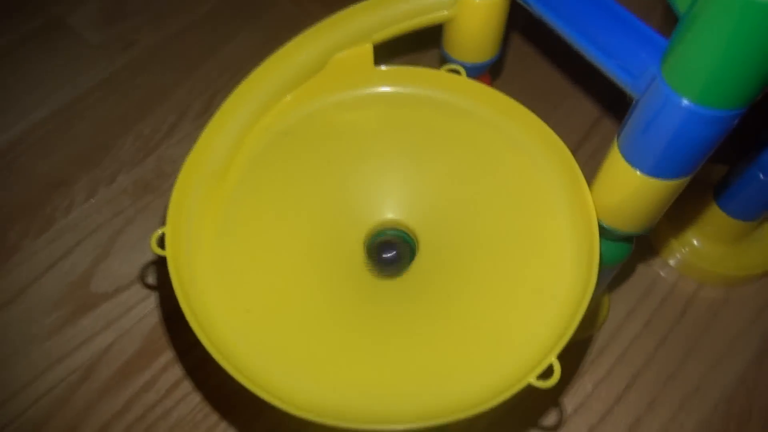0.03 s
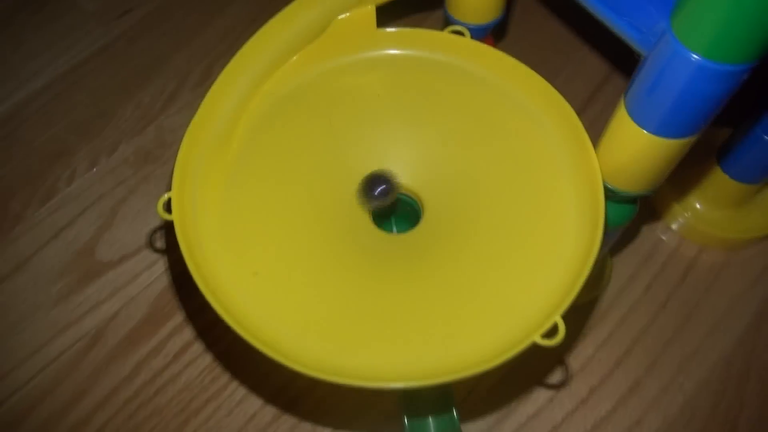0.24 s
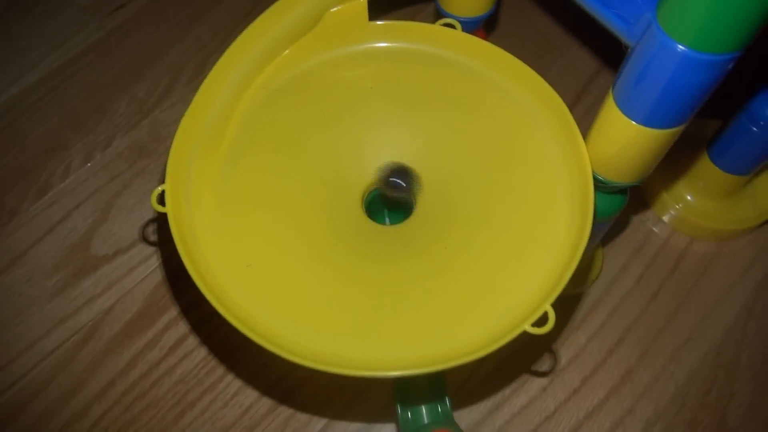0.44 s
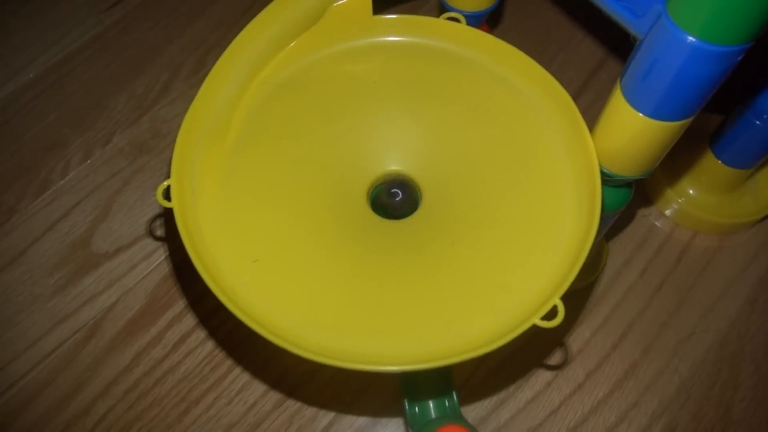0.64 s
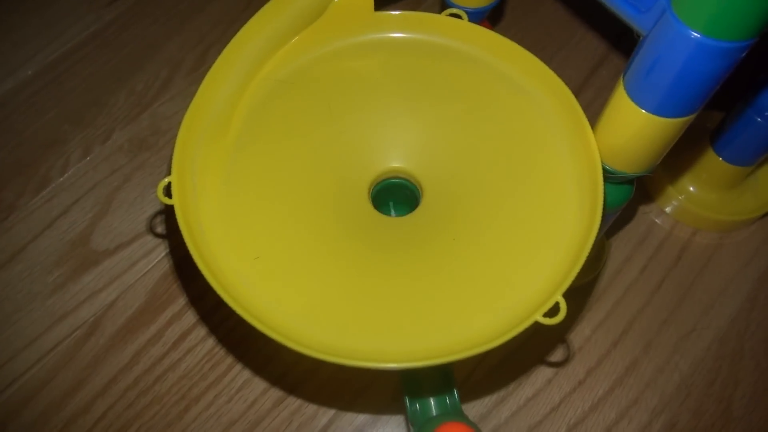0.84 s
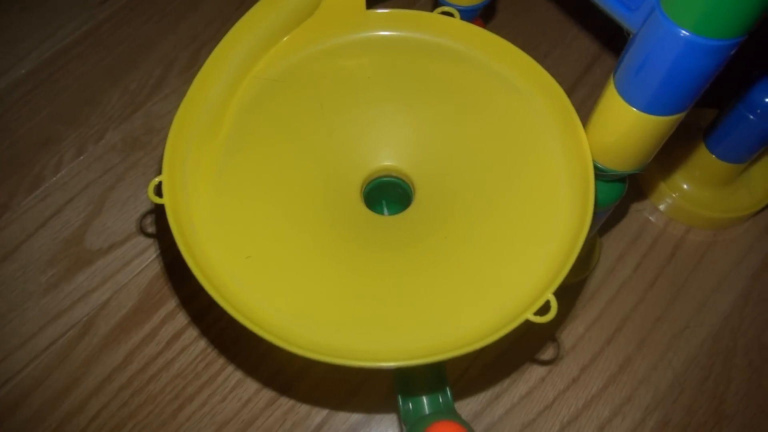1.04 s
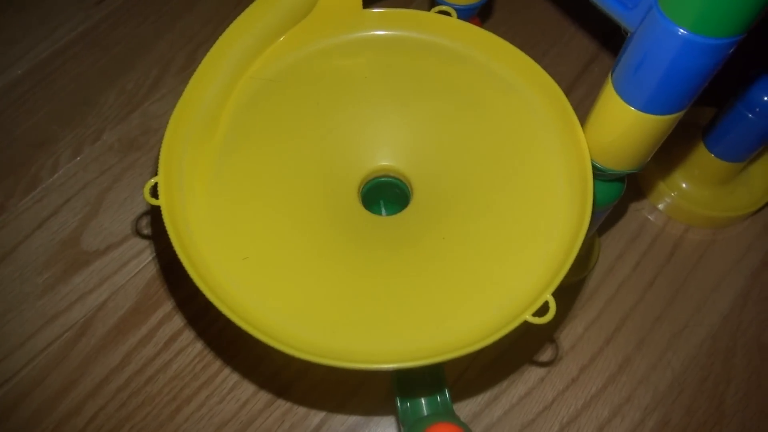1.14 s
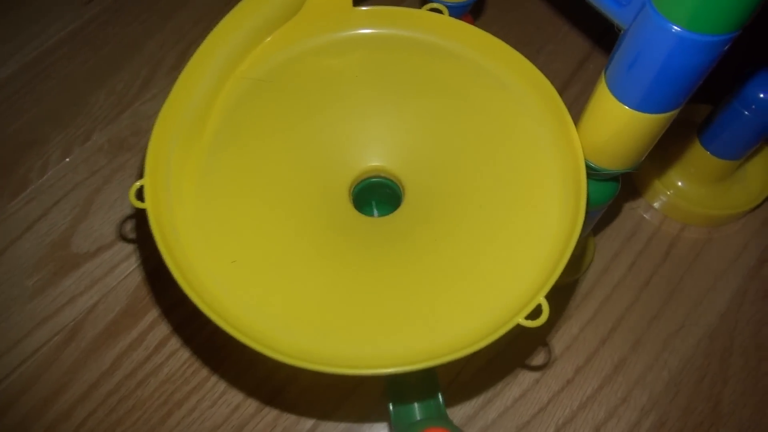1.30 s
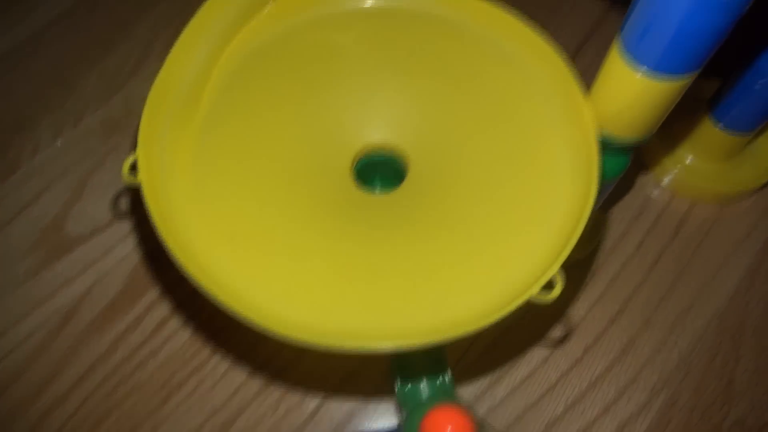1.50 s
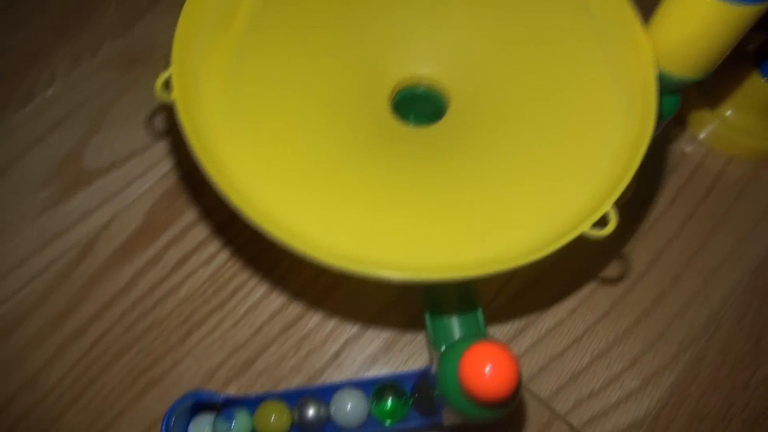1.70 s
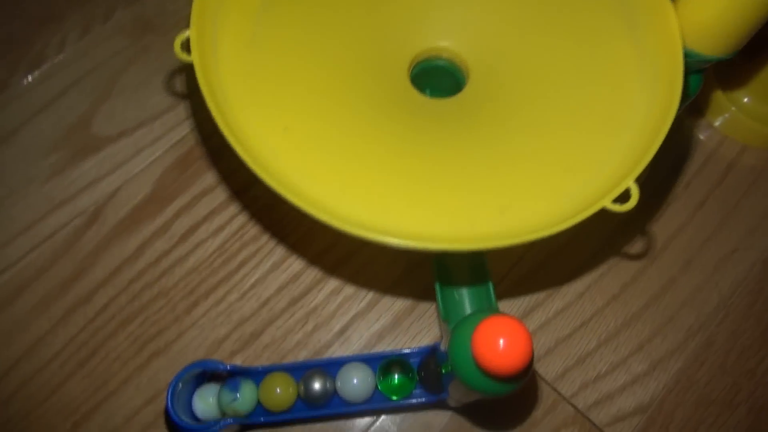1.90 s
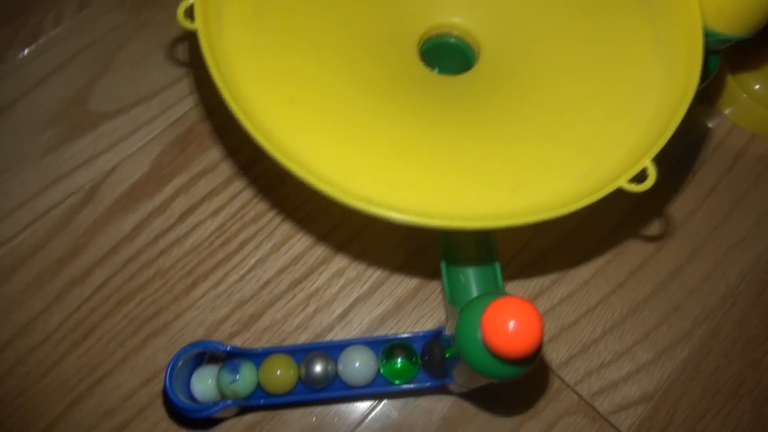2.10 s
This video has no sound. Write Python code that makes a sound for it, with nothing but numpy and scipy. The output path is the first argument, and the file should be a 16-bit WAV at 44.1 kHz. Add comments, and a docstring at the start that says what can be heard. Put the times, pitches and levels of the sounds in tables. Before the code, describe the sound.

A glass marble circles a plastic funnel with a low rumble, rattles harder and falls through. It rolls quietly along a chute, then clatters onto a track, followed by a clink and faint ticks, close to the microphone.

```python
"""A low, circling rumble: a glass marble rounds the throat of a plastic funnel, skips ever harder on the
wall and falls through. It rolls quietly along a chute, drops, and clatters onto a track on a wooden
floor; a glass clink and three light ticks follow. Every contact rings the whole plastic tower.
The microphone is close and hand-held, louder on the left, with soft handling thumps and a limiter."""
import sys
import numpy as np
from scipy import signal
from scipy.fft import rfft, irfft, next_fast_len
from scipy.io import wavfile
from scipy.ndimage import uniform_filter1d, minimum_filter1d

SR = 44100
rng = np.random.default_rng(int(sys.argv[2]) if len(sys.argv) > 2 else 0)


def inscribe(sig):
    """Save sig as 16-bit PCM at rate SR to the path in sys.argv[1].

    A 1-D sig is mono; a 2-D sig holds one channel per row.
    Samples are clipped to [-1, 1] before scaling.
    """
    pcm = np.round(np.clip(np.atleast_2d(sig).T, -1, 1) * 32767)
    wavfile.write(sys.argv[1], SR, pcm.astype(np.int16))


N = 94815
T = np.arange(N) / SR
SIZE = next_fast_len(N + SR, real=True)
HZ = np.arange(SIZE // 2 + 1) * SR / SIZE

# room tone: (frequency [Hz], gain [dB])
ROOM_TONE_EQ = [(22, -34), (42, -6.5), (160, -9), (800, -28.5), (15000, -43.5)]
# handling thumps: (time [s], level [dB], pitch [Hz], length [s])
THUMPS = [(1.883, -45, 56.1, 0.15), (2.133, -36, 128, 0.031)]
# light ticks and a glass clink: (time [s], level [dB])
TICKS = [(1.718, -48), (1.956, -50.5), (2.045, -53)]
CLINKS = [(1.565, -39.5)]
# rolling envelopes, and bumps on the chute's sides: (time [s], level [dB])
CHUTE_ROLL = [(1.059, -50), (1.15, -53.5), (1.18, -44), (1.335, -47), (1.35, -72.5)]
TRACK_ROLL = [(1.376, -46.5), (1.419, -42.5), (1.443, -27.5), (1.56, -61.5)]
CHUTE_BUMPS = [(1.078, -53), (1.146, -44.5), (1.172, -41.5), (1.2085, -36), (1.296, -32.5), (1.325, -39.5),
               (1.332, -32.5)]
# rolling envelope and wall knocks in the funnel: (time [s], body level [dB], rattle level [dB])
FUNNEL_ROLL = [(0.0, -42.5, -58), (0.188, -47, -61), (0.298, -34, -55.5), (0.494, -48.5, -59),
               (0.508, -31.5, -53.5), (0.6, -31, -47), (0.625, -30, -52), (0.635, -20, -26),
               (0.678, -33, -43), (0.706, -26, -29), (0.765, -24.5, -27), (0.815, -35, -41),
               (0.855, -42, -42), (0.892, -28.5, -32), (0.936, -30.5, -40.5), (0.972, -32, -50.5),
               (0.989, -32, -48)]
FUNNEL_KNOCKS = [(0.3382, -27.5, -45), (0.504, -26, -47.5), (0.63, -22.5, -31.5), (0.665, -20, -41.5),
                 (0.693, -22.5, -31), (0.7322, -19.5, -41), (0.7464, -16, -14.5), (0.767, -20, -18.5),
                 (0.78, -20, -38), (0.792, -30, -19), (0.8023, -27, -25.5), (0.8613, -11.5, -20.5),
                 (0.884, -20.5, -26.5), (0.916, -21, -34), (0.9474, -19.5, -35.5), (0.9607, -24, -36)]
# hard bounces, two in the funnel's throat, the rest on the track:
# (time [s], body level [dB], crack level [dB], clack pitch [Hz])
BOUNCES = [(0.831, -18.5, -13, 1570), (0.837, -42, -23, 2720), (1.3861, -10.5, -11, 1620),
           (1.399, -23.5, -19, 1970), (1.4141, -25.5, -21, 5580), (1.4311, -11.5, -8.5, 2730),
           (1.456, -22, -33, 5740), (1.4708, -28.5, -13.5, 4030), (1.478, -21, -21.5, 7280),
           (1.496, -20, -24.5, 2180)]
# tone of each part and kind of contact: (frequency [Hz], gain [dB])
TICK_EQ = [(120, -1.5), (1400, 8), (2700, 2), (4200, -28), (15000, -29)]
CLINK_EQ = [(4500, -2), (7000, 5), (12000, -29)]
CHUTE_EQ = [(220, -20), (620, -5), (1600, 4.5), (4300, -10.5), (13000, -35)]
TRACK_EQ = [(60, -19), (175, -5.5), (280, -3), (620, 8.5), (2600, 12), (3500, 0.5), (15000, -36.5)]
RUMBLE_EQ = [(200, -41.5), (370, 7), (800, 10.5), (1300, 5), (2400, -40)]
FUNNEL_EQ = [(60, -26.5), (280, -13), (420, -8), (530, -9.5), (700, 1), (1100, -3), (2000, 6),
             (2350, -12.5), (3000, -22), (15000, -73)]
RATTLE_EQ = [(600, -30.5), (2000, -1), (2850, 8.5), (4500, -1.5), (4950, -3), (8200, -11), (15000, -28)]
CRACK_EQ = [(500, -19.5), (2000, 7), (5800, 1.5), (8500, -7.5), (12500, -18.5), (15000, -29.5)]
# ringing of the plastic parts: (frequency [Hz], resonance height [dB])
CHUTE_MODES = [(371, 24), (1150, 2.3), (1620, 2.3), (2480, 15), (3070, 7)]
TRACK_MODES = [(184, 18), (636, 8.1), (1276, 8.4), (2558, 5.3), (2743, 4.3), (3060, 9.1)]
FUNNEL_MODES = [(184, 15.5), (421, 9), (636, 12), (977, 14), (1046, 12), (1116, 17), (2020, 8.5)]
# stereo lean: (frequency [Hz], left minus right [dB])
BALANCE = [(60, 16.5), (600, 10), (13000, 13.5)]

RING_T60_S, TREBLE_T60_S = 0.23, 0.2
SCATTER_DB, SCATTER_T60_S = 2.5, 0.036   # waves running to and fro in the plastic
HOP_S, HOP_SPREAD, HOP_SPREAD_DB = .0052, .22, 12   # the rolling marble makes tiny hops
GRIT_PER_S, GRIT_DB = 2800, -6   # surface roughness between the hops
BLOW_S = 0.007   # a blow's level is its energy spread over this time


def from_db(db):
    """Decibels to gain."""
    return 10 ** (np.asarray(db) / 20)


def unit(x):
    """Scale to energy 1."""
    return x / np.sqrt(np.sum(x ** 2) + 1e-20)


def envelope(times, db):
    """Gain along a level curve, silent outside it."""
    return from_db(np.interp(T, times, db, left=-120, right=-120))


def eq_curve(points):
    """Gain at every frequency from (Hz, dB) points."""
    hz, db = np.transpose(points)
    return from_db(np.interp(np.log(HZ + 1), np.log(hz), db))


def colour(points):
    """Minimum-phase filter with this EQ, so nothing sounds ahead of a hit."""
    cepstrum = irfft(np.log(eq_curve(points)), SIZE)
    cepstrum[1:SIZE // 2] *= 2
    cepstrum[SIZE // 2 + 1:] = 0
    return np.exp(rfft(cepstrum))


def coloured_noise(points):
    """Steady noise through this EQ."""
    return irfft(rfft(rng.standard_normal(SIZE)) * eq_curve(points), SIZE)[:N]


def resonance(hz, width_hz):
    """One resonance of height 1."""
    return 1j * HZ * width_hz / (hz ** 2 - HZ ** 2 + 1j * HZ * width_hz)


def crossover(low, high, split_hz=3080):
    """One spectrum in the bass, another in the treble."""
    treble = 1 / (1 + (split_hz / (HZ + 1)) ** 4)
    return np.sqrt(1 - treble) * low + np.sqrt(treble) * high


def reflections(t60):
    """Spectrum of a dense, dying cloud of echoes that builds up in half a millisecond."""
    onset = 1 - np.exp(-(T / .0005) ** 2)
    return rfft(unit(rng.standard_normal(N) * onset * from_db(-60 * T / t60)), SIZE)


def room_tone(db=-59.5):
    """A bed of low room rumble and faint hiss."""
    return from_db(db) * np.sqrt(N) * unit(coloured_noise(ROOM_TONE_EQ))


def room_tail(db=-4, treble_db=-2.5):
    """Spectrum of the room's reverb, weaker and shorter in the treble."""
    return from_db(db) * crossover(reflections(t60=.23), from_db(treble_db) * reflections(TREBLE_T60_S))


def handling(roughness=0.23):
    """Dull, short swells of bass as the microphone is moved."""
    bass_band = signal.butter(2, [40, 190], "band", fs=SR, output="sos")
    rub = unit(signal.sosfilt(bass_band, rng.standard_normal(N))) * np.sqrt(N)
    out = 0
    for start, db, hz, length in THUMPS:
        age = np.maximum(T - start, 0)
        swell = 4 * age / length * np.exp(1 - 4 * age / length)
        out = out + from_db(db) * swell * (np.sin(2 * np.pi * hz * age) + roughness * rub)
    return out


def scatter(count=38, spacing_hz=414):
    """Spectrum of one struck spot's short ring: dense low down, separate resonances in the treble."""
    pitches = (np.arange(count) + rng.random(count)) * spacing_hz
    strengths = rng.standard_normal(count)
    age = T[:SR // 8]
    partials = strengths @ np.sin(2 * np.pi * np.outer(pitches, age))
    clack = unit(partials * from_db(-60 * age / SCATTER_T60_S))
    return crossover(reflections(SCATTER_T60_S), rfft(clack, SIZE))


def tower_spots(modes, count=7, direct_hz=2780):
    """Responses of several spots on a part: shared pulse, modes and room, plus each spot's own scatter."""
    decay = from_db(-60 * T / RING_T60_S)
    ring = sum(from_db(db) * np.cos(2 * np.pi * hz * T) for hz, db in modes) * 2 * decay / decay.sum()
    direct = 1 / (1 + 1j * HZ / direct_hz) ** 2   # the top end arrives mostly as scattered waves
    shared = direct + rfft(ring, SIZE) + room_tail()
    return [shared + from_db(SCATTER_DB) * scatter() for _ in range(count)]


def excite(forces, tone, spots):
    """Forces ring the tower at several spots, heard through the tone of the struck part."""
    spectrum = 0
    for force, spot in zip(forces, spots):
        response = tone * spot
        spectrum = spectrum + rfft(force, SIZE) * response / np.sqrt(np.mean(abs(response) ** 2))
    return irfft(spectrum, SIZE)[:N] * np.sqrt(BLOW_S * SR)


def blows(times, db, count=7):
    """One click of force for each blow, dealt in turn to a few contact spots."""
    forces = np.zeros((count, N))
    samples = np.clip((times * SR).astype(int), 0, N - 1)
    forces[np.arange(len(times)) % count, samples] = from_db(db)
    return forces


def rolling(hop_count=700):
    """Force of a rolling marble: quick, uneven hops with fine grit between them."""
    timing, weight = rng.standard_normal((hop_count, 2)).T
    times = np.cumsum(HOP_S * np.exp(HOP_SPREAD * timing))
    inside = times < T[-1]
    hops = blows(times[inside], HOP_SPREAD_DB * np.minimum(weight[inside], 1))
    grit = rng.standard_normal(hops.shape) * (rng.random(hops.shape) < GRIT_PER_S / SR / len(hops))
    return unit(unit(hops) + from_db(GRIT_DB) * unit(grit)) * np.sqrt(T[-1] / BLOW_S)


def taps(cues, eq, spots):
    """Light contacts just stir the tower: a tick or a glassy clink, depending on the EQ."""
    return excite(blows(*np.transpose(cues)), colour(eq), spots)


def chute(spots, dull_hz=1300):
    """The marble rolls along the hollow chute and bumps its sides; both ring it, the roll more dully."""
    hollow = colour(CHUTE_EQ)
    for hz, db in CHUTE_MODES:
        hollow = hollow * (1 + from_db(db) * resonance(hz, width_hz=47))
    roll = rolling() * envelope(*np.transpose(CHUTE_ROLL))
    bumps = blows(*np.transpose(CHUTE_BUMPS))
    return excite(roll, hollow / (1 + 1j * HZ / dull_hz), spots) + excite(bumps, hollow, spots)


def track_skitter(spots):
    """The marble skitters over the track in a short burst of tiny hops."""
    return excite(rolling() * envelope(*np.transpose(TRACK_ROLL)), colour(TRACK_EQ), spots)


def orbit_rumble(db=-39, orbits_per_s=4.9, echo_s=0.00558, swing=0.27):
    """Smooth rolling, flanged as the rim's reflection comes sooner and later on each orbit."""
    noise = coloured_noise(RUMBLE_EQ)
    lag = echo_s * (1 + swing * np.sin(2 * np.pi * orbits_per_s * T))
    flanged = unit(noise + .5 * np.interp(T - lag, T, noise)) * np.sqrt(N)
    since_leaving = np.maximum(T - FUNNEL_ROLL[-1][0], 0)   # dies away once the marble is off the wall
    return flanged * from_db(db - 60 * since_leaving / RING_T60_S)


def funnel(spots):
    """The marble rolls round the throat and knocks on it; hard contacts add a bright plastic rattle."""
    roll_times, roll_body_db, roll_rattle_db = np.transpose(FUNNEL_ROLL)
    knock_times, knock_body_db, knock_rattle_db = np.transpose(FUNNEL_KNOCKS)
    roll = rolling()
    body = roll * envelope(roll_times, roll_body_db) + blows(knock_times, knock_body_db)
    rattle = roll * envelope(roll_times, roll_rattle_db) + blows(knock_times, knock_rattle_db)
    return excite(body, colour(FUNNEL_EQ), spots) + excite(rattle, colour(RATTLE_EQ), spots)


def bounces(spots, clack_db=8):
    """Glass hits stiff plastic: a body knock, and a crack pitched by one resonance of the struck spot."""
    times, body_db, crack_db, pitches = np.transpose(BOUNCES)
    out = excite(blows(times, body_db), colour(TRACK_EQ), spots)
    crack = colour(CRACK_EQ)
    for k, force in enumerate(blows(times, crack_db, count=len(times))):
        clack = crack * (1 + from_db(clack_db) * resonance(pitches[k], width_hz=250))
        out = out + excite([force], clack, [spots[k % len(spots)]])
    return out


def stereo(mono, diffuse_db=1, diffuse_hz=5860):
    """The image leans hard left; on the right the treble is partly diffuse."""
    mid, lean = rfft(mono, SIZE), eq_curve(BALANCE)
    diffuse = from_db(diffuse_db) * HZ ** 2 / (HZ ** 2 + diffuse_hz ** 2)
    right = (1 + diffuse * reflections(TREBLE_T60_S)) / np.sqrt(1 + diffuse ** 2)
    return irfft(np.array([lean, right]) * 2 * mid / (1 + lean), SIZE)[:, :N]


def scene():
    """The marble's run and the small sounds after it, over handling and room tone."""
    wall, track = tower_spots(FUNNEL_MODES), tower_spots(TRACK_MODES)
    marble = orbit_rumble() + funnel(wall) + chute(track) + track_skitter(track) + bounces(track)
    clink = taps(CLINKS, CLINK_EQ, track)
    ticks = taps(TICKS, TICK_EQ, track)
    return stereo(marble + clink + ticks + handling() + room_tone())


def record(dry, limit_db=-6, release_db_per_s=699, stopband_hz=15800):
    """A fast limiter holds the peaks; a steep low-pass takes off the very top."""
    peak_db = 20 * np.log10(abs(dry).max(axis=0) + 1e-9)
    over_db = np.maximum(peak_db - limit_db, 0)
    reduction_db = np.maximum.accumulate(over_db + release_db_per_s * T) - release_db_per_s * T
    gain_db = uniform_filter1d(minimum_filter1d(-reduction_db, size=33), size=33)   # smooth look-ahead
    high_cut = signal.cheby2(12, 60, stopband_hz, fs=SR, output="sos")
    return signal.sosfilt(high_cut, dry * from_db(gain_db))


dry = scene()
out = record(dry)
inscribe(out)
```